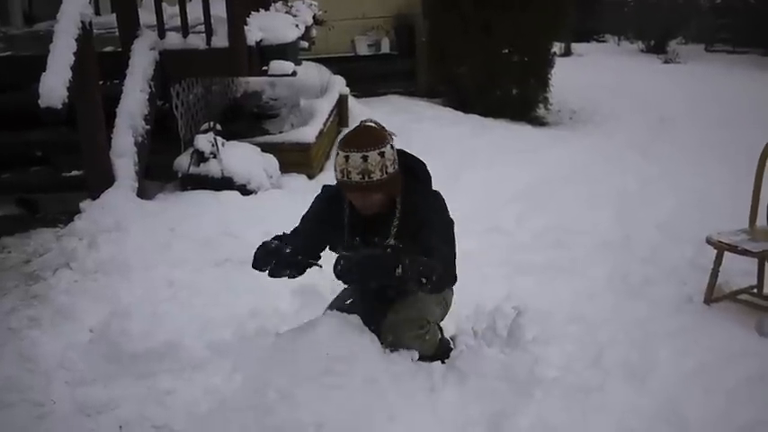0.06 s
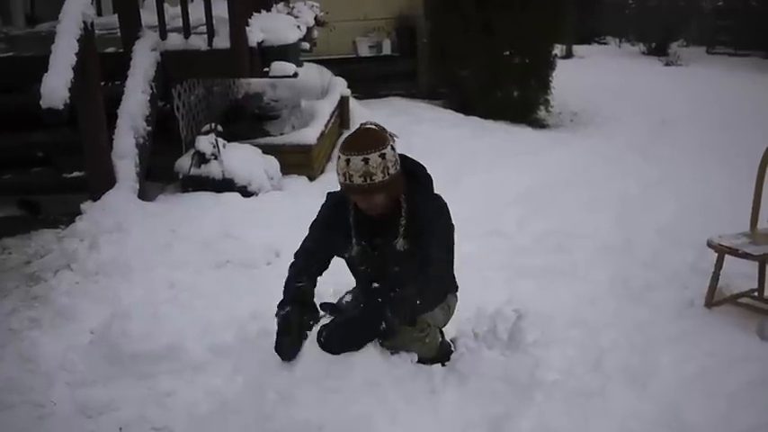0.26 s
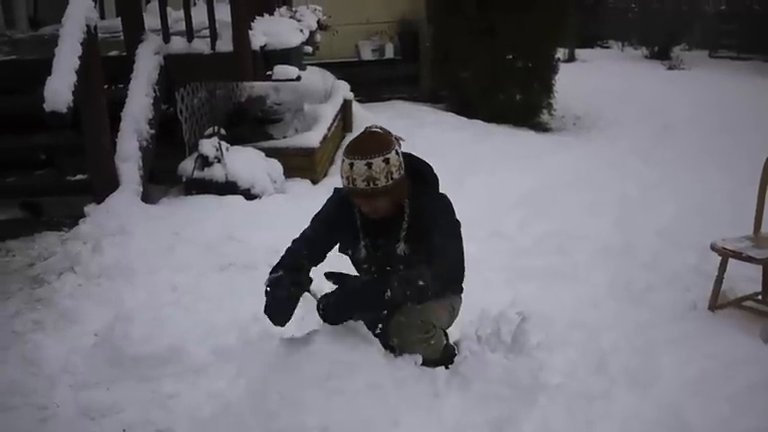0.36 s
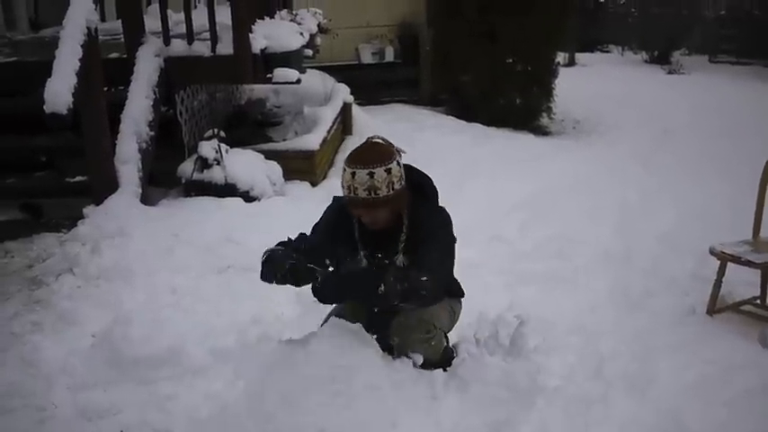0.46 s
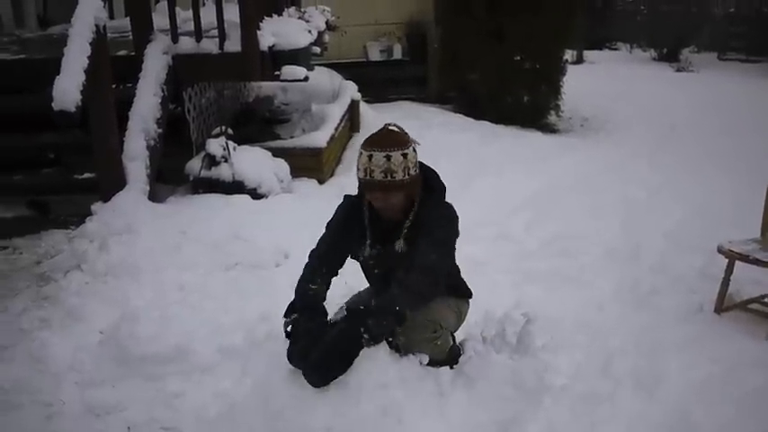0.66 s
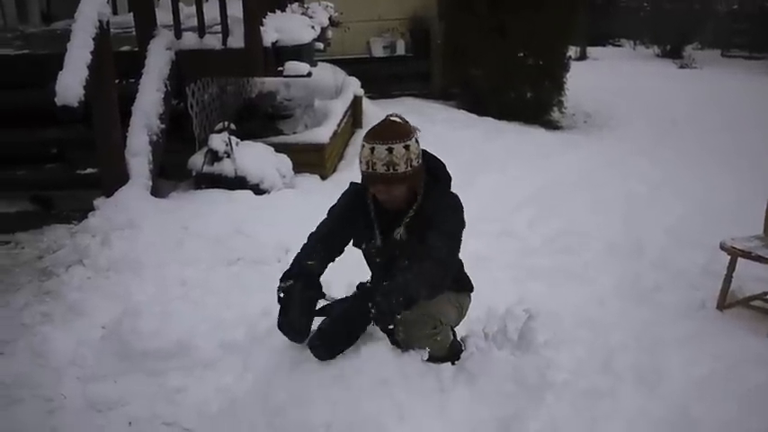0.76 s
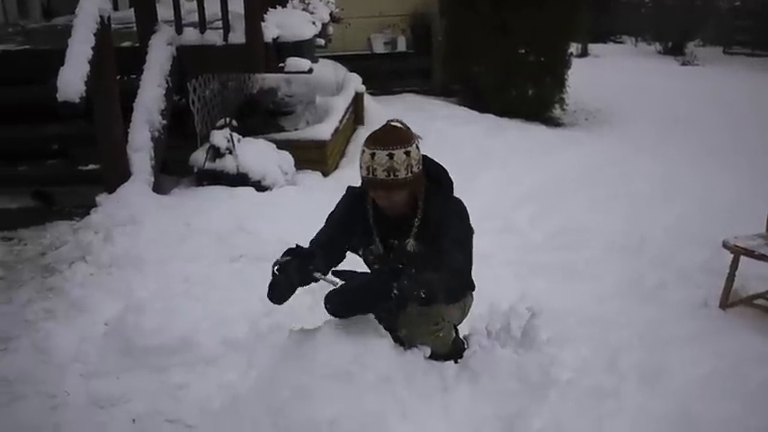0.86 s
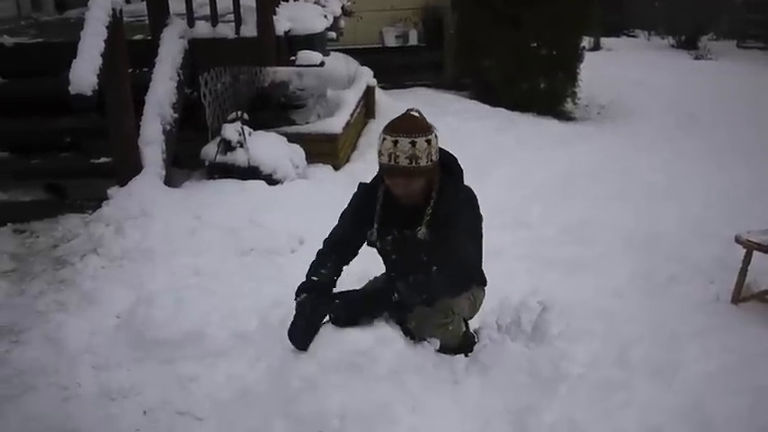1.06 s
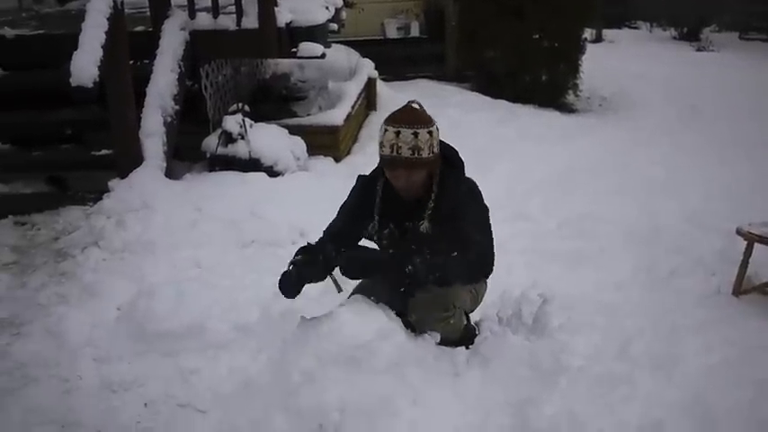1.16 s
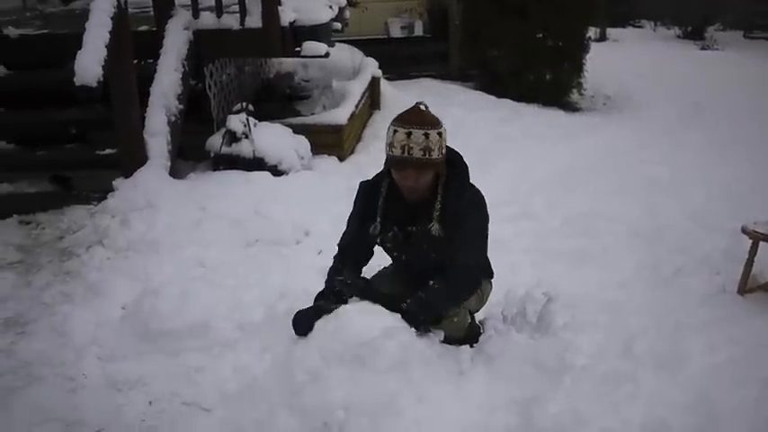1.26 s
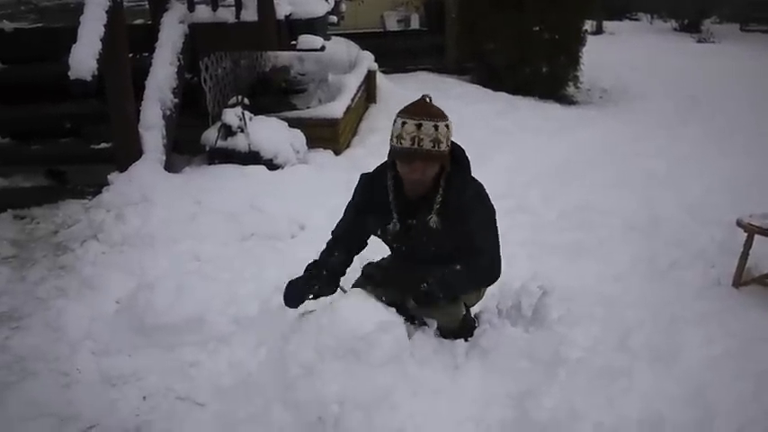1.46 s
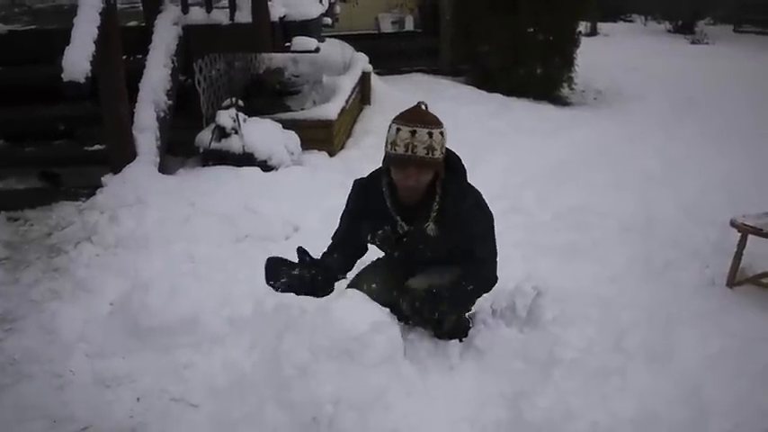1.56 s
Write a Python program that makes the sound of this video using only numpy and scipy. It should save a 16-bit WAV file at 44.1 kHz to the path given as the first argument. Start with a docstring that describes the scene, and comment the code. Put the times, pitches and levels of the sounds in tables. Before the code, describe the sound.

Gloves pack damp snow in four evenly paced pats, each a short crunch with a soft thud. Small snow ticks and light sleeve rustle fill the gaps. The microphone is close, outdoors, over very quiet background noise.

```python
"""A quiet yard: gloved hands pat a mound of damp snow four times, each pat two or three quick contacts.
A contact crushes snow grains, pops the air out from under the glove and thuds into the mound.
Crumbs tick and sleeves rustle between pats; the snow scatters the sound and the house returns a little.
Behind it all lie a faint distant wash, a fading hiss and a drone that swells at the end."""
import sys
import numpy as np
from scipy import signal
from scipy.fft import rfft, irfft
from scipy.io import wavfile

SR = 44100
rng = np.random.default_rng(int(sys.argv[2]) if len(sys.argv) > 2 else 0)


def pcm_store(signal):
    """Save signal as 16-bit PCM."""
    levels = np.round(np.clip(np.atleast_2d(signal), -1, 1) * 32767)
    wavfile.write(sys.argv[1], SR, levels.astype(np.int16).T)


N = 70560
T = np.arange(N) / SR


def undb(db):
    """Decibels to gain."""
    return 10 ** (np.asarray(db) / 20)


def unit(x):
    """Scale to rms 1."""
    return x / np.sqrt(np.mean(x ** 2) + 1e-18)


def fader(points):
    """Gain curve through (t/s, level/dB) points."""
    return undb(np.interp(T, *np.array(points).T))


def colour(x, points):
    """Minimum-phase filter through (f/Hz, level/dB) points."""
    hz, db = np.array(points).T
    bin_hz = np.arange(N // 2 + 1) * SR / N
    log_gain = np.log(undb(np.interp(np.log(bin_hz + 1), np.log(hz), db)))
    cepstrum = irfft(log_gain, N)
    cepstrum[1:N // 2] *= 2
    cepstrum[N // 2 + 1:] = 0
    return irfft(rfft(x) * np.exp(rfft(cepstrum)), N)


def band_noise(hz, width_hz):
    """Noise in one band, rms 1."""
    edges_hz = [max(hz - width_hz / 2, 30), hz + width_hz / 2]
    band = signal.butter(2, edges_hz, "bandpass", fs=SR, output="sos")
    return unit(signal.sosfilt(band, rng.standard_normal(N)))


def grains(per_s, spread_db):
    """Random impulses, most weak, a few stronger."""
    fires = rng.random(N) < per_s / SR
    size = np.minimum(rng.exponential(size=N), np.pi)
    sign = rng.choice([-1, 1], N)
    return fires * undb(spread_db * size) * sign


def burst(x, start_s, attack_s, hold_s, decay_s):
    """Gate a texture: linear attack, decay from hold_s after the start; rms about 1 at full level."""
    age_s = T - start_s
    envelope = np.clip(age_s / attack_s, 0, 1) * np.exp(-np.maximum(age_s - hold_s, 0) / decay_s)
    return unit(x * envelope) * np.sqrt(np.mean(envelope ** 2))


def knock(start_s, hz, rise_s, sag_per_s=0):
    """Heavily damped resonance under a soft push, with optional pitch sag."""
    age_s = np.maximum(T - start_s, 0)
    cycles = np.cumsum((age_s > 0) * hz / (1 + sag_per_s * age_s)) / SR
    envelope = (age_s / rise_s * np.exp(1 - age_s / rise_s)) ** 2
    return envelope * np.sin(2 * np.pi * cycles)


# Wash spectrum: f/Hz, relative level/dB
WASH_SPECTRUM = [(25, -20.5), (60, -15.5), (90, -8.5), (150, -15.5), (210, -8.5), (310, -10.5), (400, -5),
                 (540, -4), (670, -4.5), (850, -4.5), (1100, -6.5), (1550, -8.5), (2150, -15), (3500, -23),
                 (6100, -28.5), (7200, -39.5)]
# Wash envelope: t/s, level/dB
WASH_LEVEL = [(0, -48), (.17, -48.5), (.46, -47.5), (.75, -51.5), (.95, -51), (1.27, -51), (1.6, -51)]


def distant_wash():
    """Soft broad noise, slowly ebbing."""
    return unit(colour(rng.standard_normal(N), WASH_SPECTRUM)) * fader(WASH_LEVEL)


def distant_hiss(start_db=-51.5, fall_db_per_s=15):
    """Narrow hiss, fading away."""
    return band_noise(hz=1046, width_hz=190) * undb(start_db - fall_db_per_s * T)


# Drone envelope: t/s, level/dB
DRONE_LEVEL = [(0, -53), (1.25, -64), (1.42, -57), (1.6, -52.5)]


def distant_drone():
    """Faint noise band that sinks, then swells at the end."""
    return band_noise(hz=673, width_hz=170) * fader(DRONE_LEVEL)


# Fine crackle of cloth and settling snow: f/Hz, relative level/dB
CRACKLE_SPECTRUM = [(200, -16), (800, -13), (1600, -1.5), (3200, 1), (4800, -7.5), (7000, -13.5)]
# Arm movements: centre t/s, half length/s, level/dB
ARM_MOVES = [(.01, 0.01, -52), (0.346, 0.057, -54.5), (.78, 0.059, -55.5), (.845, 0.015, -58.5),
             (1.137, 0.017, -54.5), (1.39, 0.016, -55), (1.472, 0.043, -57)]


def sleeves():
    """Cloth crackle, swelling with each arm movement."""
    motion = sum(undb(db) * np.exp(-((T - centre_s) / half_s) ** 2) for centre_s, half_s, db in ARM_MOVES)
    return motion * unit(colour(grains(per_s=3000, spread_db=1), CRACKLE_SPECTRUM))


# Crust snaps, crumbs and glove ticks: t/s, level/dB, f/Hz, decay/s
CRUMB_TICKS = [(0.185, -37.5, 2800, 0.00081), (.1850, -54.5, 6000, .002), (0.2579, -31, 1600, 0.0029),
               (.2690, -43.5, 2600, .003), (0.2964, -45.5, 3700, 0.0042), (0.4116, -48.5, 2800, .002),
               (0.6101, -22, 3900, 0.00083), (0.6669, -37.5, 1690, 0.0031), (0.7058, -51, 5700, 0.0018),
               (0.8682, -45.5, 4700, 0.00083), (1.0492, -45.5, 2210, 0.0089), (1.073, -44, 5200, 0.0014)]


def crumbs(relative_width=0.53, attack_s=0.001):
    """Brief ticks of snow and glove, each in its own noise band."""
    return sum(undb(db) * burst(band_noise(hz, relative_width * hz), start_s, attack_s, attack_s, decay_s)
               for start_s, db, hz, decay_s in CRUMB_TICKS)


# Mound shudder: f/Hz, relative level/dB
MOUND_SPECTRUM = [(25, -44), (60, -12), (105, 4), (170, -3), (280, 2.5), (380, -10), (700, -0.5),
                  (1500, -40), (4000, -46)]
# Ground rumble: f/Hz, relative level/dB
GROUND_SPECTRUM = [(25, -24.5), (60, 0), (90, 0), (130, -1), (260, -16), (1000, -54)]


def mound_thuds(contacts, lag_s=0.00081, swell_s=0.0076):
    """Thuds sag in pitch as the snow gives; the mound shudders, the ground rumbles a little longer."""
    mound = colour(rng.standard_normal(N), MOUND_SPECTRUM)
    ground = colour(rng.standard_normal(N), GROUND_SPECTRUM)
    out = np.zeros(N)
    for start_s, crush_s, *_, db, hz in contacts:
        thud = knock(start_s + lag_s, hz, rise_s=0.0032, sag_per_s=11)
        shudder = burst(mound, start_s + crush_s, swell_s, swell_s, decay_s=0.011)
        rumble = burst(ground, start_s, swell_s, swell_s, decay_s=0.035)
        out += undb(db) * (thud + undb(-10) * shudder + undb(-30) * rumble)
    return out


# Crushing snow grains: f/Hz, relative level/dB
CRUNCH_SPECTRUM = [(60, -19), (200, -6.5), (340, -9), (520, 2.5), (850, 7.5), (1080, -2), (1400, 3),
                   (1650, -2), (2100, 1.5), (2800, -5), (3600, -7.5), (5000, -18.5), (6600, -23)]


def snow_crunch(contacts, crack_lag_s=0.00221, crack_rise_s=0.00074):
    """Grains fracture, the snow cracks once as the glove beds in, loose grains settle."""
    crushing = colour(grains(per_s=7000, spread_db=2), CRUNCH_SPECTRUM)
    settling = colour(grains(per_s=3500, spread_db=2), CRACKLE_SPECTRUM)
    cracking = band_noise(hz=1870, width_hz=2100)
    out = np.zeros(N)
    for start_s, crush_s, db, *_ in contacts:
        crunch = burst(crushing, start_s, attack_s=0.0011, hold_s=crush_s, decay_s=0.0037)
        crack = burst(cracking, start_s + crack_lag_s, crack_rise_s, crack_rise_s, decay_s=0.00083)
        settle = burst(settling, start_s, crush_s, crush_s, decay_s=0.021)
        out += undb(db) * (crunch + undb(3) * crack + undb(-19) * settle)
    return out


def air_pops(contacts, lag_s=0.0011):
    """Air pops out from under the glove."""
    return sum(undb(db) * knock(start_s + lag_s, hz, rise_s)
               for start_s, _, _, db, hz, rise_s, _, _ in contacts)


# Glove on snow: t/s, crush time/s, crunch level/dB,
# pop level/dB, pop f/Hz, pop rise/s, thud level/dB, thud f/Hz
GLOVE_CONTACTS = [(0.199, 0.0046, -26.5, -16.5, 630, 0.0013, -21.5, 160),
                  (.2046, 0.0045, -22, -13.5, 613, 0.0034, -20.5, 172),
                  (.5920, 0.01, -29.5, -10, 673, 0.0021, -22, 180),
                  (0.6, 0.0091, -33, -22.5, 689, 0.0026, -28, 107),
                  (0.6121, 0.0057, -23.5, -13, 704, 0.0016, -27.5, 160),
                  (0.9791, 0.006, -32, -24.5, 573, 0.002, -25.5, 150),
                  (.9978, 0.0013, -24, -16, 630, 0.0018, -21, 215),
                  (1.3055, 0.0039, -30, -19, 525, 0.0025, -29.5, 131),
                  (1.3303, 0.0049, -27, -16, 631, 0.0017, -26, 205)]


def pats():
    """Four pats; every contact crunches, pops and thuds."""
    return snow_crunch(GLOVE_CONTACTS) + air_pops(GLOVE_CONTACTS) + mound_thuds(GLOVE_CONTACTS)


def reflections(x, lag_s, decay_s):
    """Diffuse echoes that start after a lag and die away."""
    response = rng.standard_normal(N) * np.clip(T / lag_s - 1, 0, 1) * np.exp(-T / decay_s)
    return signal.fftconvolve(x, unit(response) / np.sqrt(N))[:N]


def scene():
    """Near sounds, their echoes off snow and house, and the background; mono."""
    near = pats() + crumbs() + sleeves()
    snow_scatter = undb(-13.5) * reflections(near, lag_s=0.0048, decay_s=0.0091)
    house_echo = undb(-29) * reflections(near, lag_s=0.025, decay_s=0.06)
    background = distant_wash() + distant_hiss() + distant_drone()
    return (near + snow_scatter + house_echo + background)[None]


def record(dry):
    """Gentle bass cut, steep treble cut."""
    low_hz, top_hz = 55, 6950
    low_cut = signal.butter(2, low_hz, "highpass", fs=SR, output="sos")
    top_cut = signal.cheby1(12, 0.2, top_hz, fs=SR, output="sos")
    return signal.sosfilt(top_cut, signal.sosfilt(low_cut, dry))


dry = scene()
out = record(dry)
pcm_store(out)
```